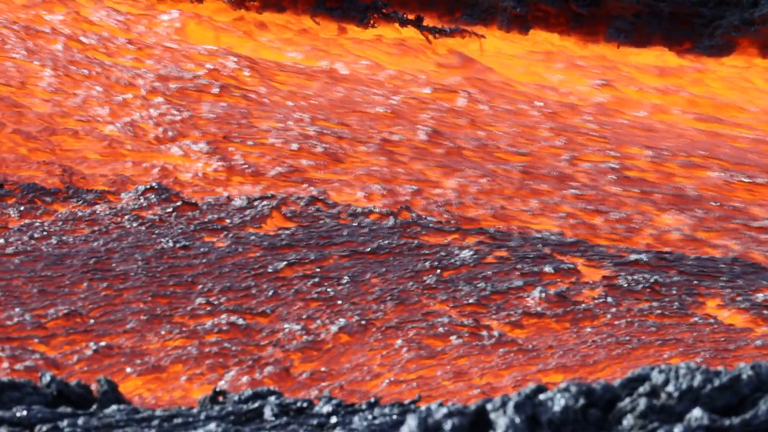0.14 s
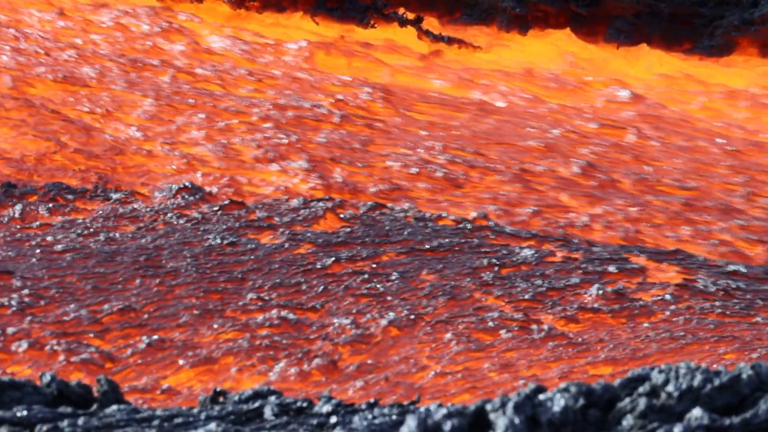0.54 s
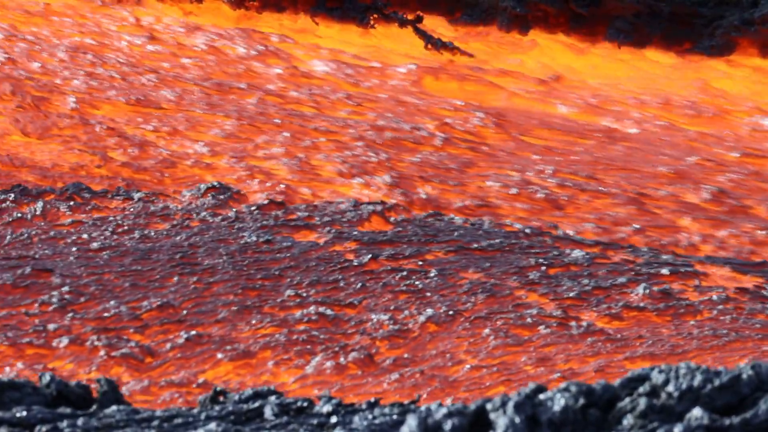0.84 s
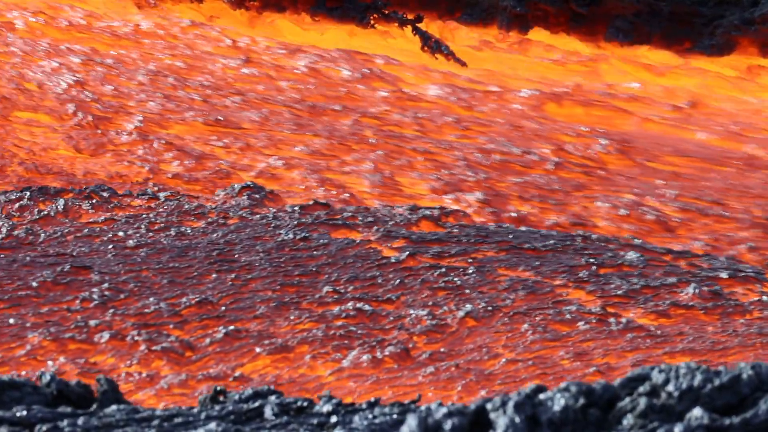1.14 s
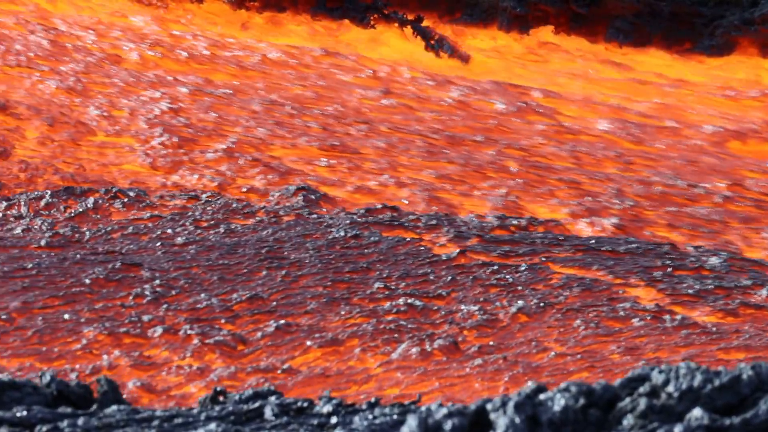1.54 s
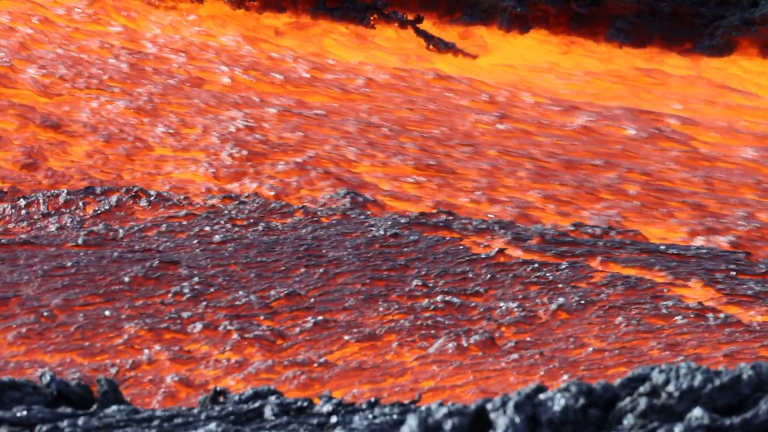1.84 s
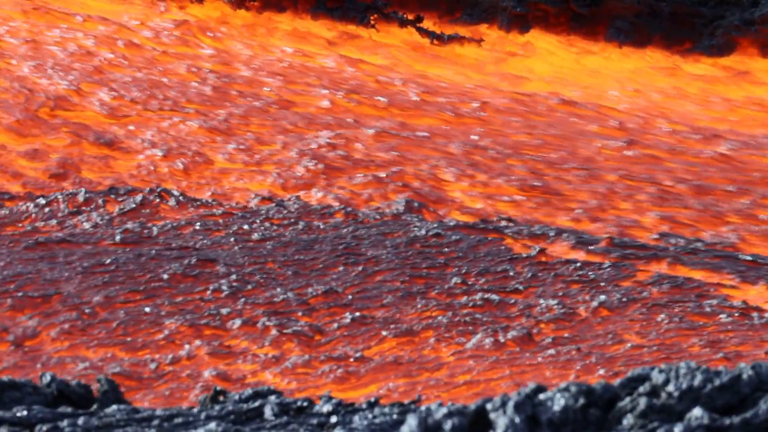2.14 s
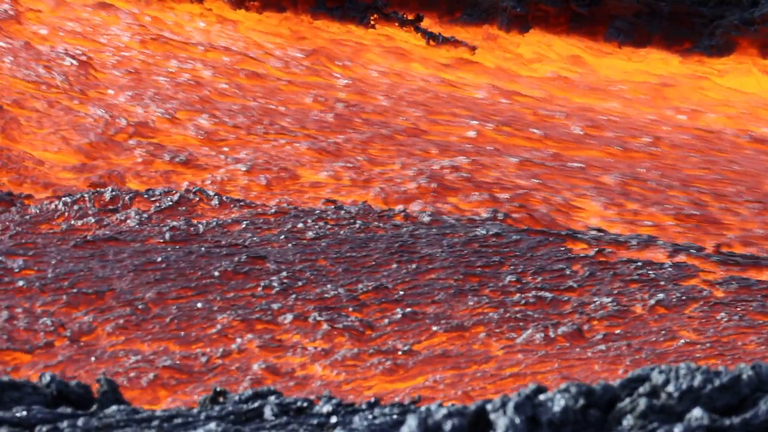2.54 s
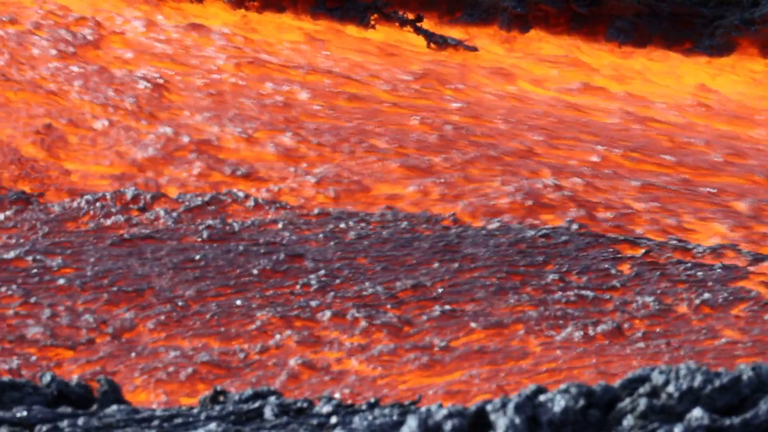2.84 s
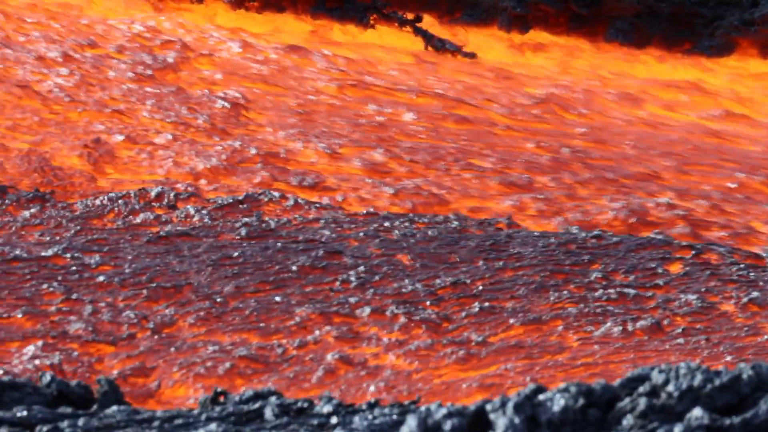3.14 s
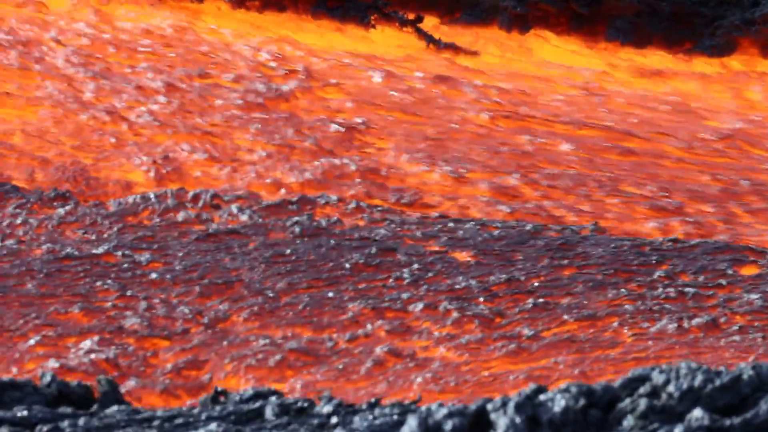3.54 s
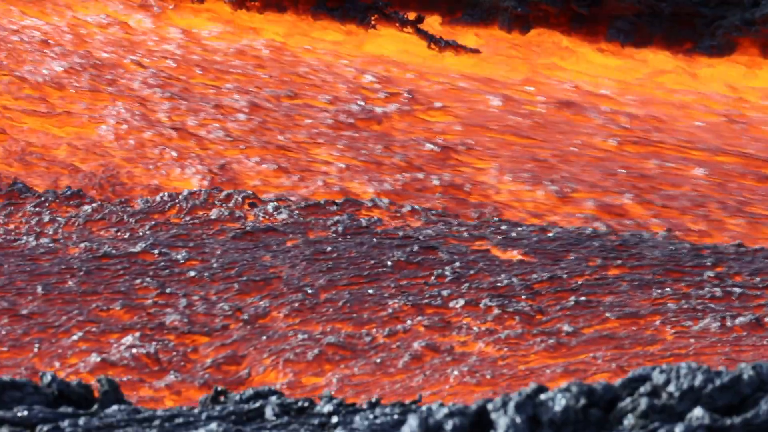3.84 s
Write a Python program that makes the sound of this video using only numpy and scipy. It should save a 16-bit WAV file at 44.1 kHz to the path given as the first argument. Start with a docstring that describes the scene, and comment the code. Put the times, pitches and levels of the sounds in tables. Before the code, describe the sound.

Low gusts of wind rumble against an outdoor microphone, rising and falling, then growing much louder near the end. Behind them, flowing lava makes a quiet, steady roar while its cooling crust faintly hisses and crackles.

```python
"""Gusts of wind buffet the microphone outdoors, building to a strong one at the end.
Turbulent eddies make a low rumble that grows louder and brighter with each gust, joined by
deep pressure swings and a rasp of air. Under the wind a lava stream flows past with a soft roar.
Its cooling crust fractures: countless tiny breaks merge into waves of sizzle, and larger ones
sound singly as small dry ticks, scattered by the rough ground."""
import sys
import numpy as np
from scipy import signal
from scipy.fft import rfft, irfft
from scipy.io import wavfile

SR = 44100
rng = np.random.default_rng(int(sys.argv[2]) if len(sys.argv) > 2 else 0)


def dump(signal):
    """Clip the signal to [-1, 1] and save it as 16-bit WAV at the path in sys.argv[1]."""
    limited = np.clip(np.atleast_2d(signal).T, -1, 1)
    pcm = np.round(limited * 32767).astype(np.int16)
    wavfile.write(sys.argv[1], SR, pcm)


N = 176400
TIME, HZ = np.arange(N) / SR, np.fft.rfftfreq(N, 1 / SR)


def amp(db):
    """Amplitude ratio of a level in decibels."""
    return 10 ** (np.asarray(db) / 20)

def unit_rms(x):
    """Normalisation to unit mean power."""
    return x / np.sqrt(np.mean(x ** 2) + 1e-20)

def spectrum_gain(spectrum, hz):
    """Magnitude response, interpolated in decibels over log frequency."""
    frequency_hz, level_db = np.transpose(spectrum)
    return amp(np.interp(np.log(hz + 1), np.log(frequency_hz + 1), level_db))

def envelope(points, t=TIME):
    """Level contour, interpolated linearly in time."""
    return np.interp(t, *np.transpose(points))

def noise(spectrum):
    """Spectral shaping: white noise filtered to a given colour, at rms 1."""
    return unit_rms(irfft(rfft(rng.standard_normal(N)) * spectrum_gain(spectrum, HZ), N))

def low_pass(x, cutoff_hz):
    """Gaussian filtering attenuates fluctuations faster than the cutoff."""
    return irfft(rfft(x) * np.exp(-(HZ / cutoff_hz) ** 2), N)

def wander(rate_hz):
    """Random modulation: low-passed noise at rms 1."""
    return unit_rms(low_pass(rng.standard_normal(N), rate_hz))


# Spectrum of the flowing lava: frequency_hz, relative_density_db
ROAR_SPECTRUM = [(20, -6), (90, 1.5), (250, -5), (500, -18.5), (1000, -16), (2000, -24.5), (3200, -36),
                 (6500, -35.5), (9300, -38.5), (11200, -34), (15500, -38)]

def lava_roar():
    """Stationary noise: the steady flow gives an even, soft roar."""
    return amp(-52.5) * noise(ROAR_SPECTRUM)


# Waves of fracturing in the cooling crust: time_s, relative_level_db
CRUST_ACTIVITY = [(0, -59), (.07, -58.5), (.16, -69), (.28, -61.5), (.42, -67.5), (.7, -70.5), (.97, -65.5),
                  (1.07, -63.5), (1.4, -64), (1.78, -66), (1.9, -72.5), (2.3, -75), (2.76, -69.5),
                  (2.97, -61.5), (3.08, -63.5), (3.18, -69), (3.52, -72.5), (3.7, -62.5), (4, -62.5)]
# Spectrum of the sizzle: frequency_hz, relative_density_db
SIZZLE_SPECTRUM = [(200, -13), (1000, 1.5), (2000, -11.5), (4000, 3), (5200, 1.5), (6800, 3.5),
                   (9300, -1.5), (11200, 1), (12800, -5), (14000, -1), (16000, -4)]

def crust_sizzle():
    """Incoherent summation: countless tiny fractures merge into a flickering hiss."""
    hiss = noise(SIZZLE_SPECTRUM)
    flicker_db = 2 * wander(rate_hz=60)
    return hiss * amp(envelope(CRUST_ACTIVITY) - 0.8 + flicker_db)

def snap(pitch_hz, decay_s):
    """Damped oscillation: one fracture rises to a peak of 1 and dies away."""
    t = np.arange(256) / SR
    age = t / decay_s
    return age * np.exp(1 - age) * np.cos(2 * np.pi * pitch_hz * (t - decay_s))

def fractures(per_s, spread_db, band_hz, typical_decay_s, pitches=24):
    """Poisson process: independent snaps across a band of pitches, most of them weak."""
    out = np.zeros(N)
    for pitch_hz in np.geomspace(*band_hz, pitches):
        strength = np.minimum(rng.exponential(1, N), 3)
        onsets = rng.random(N) < per_s / pitches / SR
        impulses = onsets * rng.choice([-1, 1], N) * amp(spread_db * strength)
        decay_s = typical_decay_s * 2 ** rng.uniform(-1.02, 1)
        out += np.convolve(impulses, snap(pitch_hz, decay_s))[:N]
    return out

def crust_crackle():
    """Amplitude modulation: fine crackling swells where the crust sizzles."""
    activity_db = envelope(CRUST_ACTIVITY)
    fine = fractures(per_s=400, spread_db=3, band_hz=(1090, 13100), typical_decay_s=0.00016)
    return fine * amp(-60 + 0.65 * (activity_db - activity_db.mean()))

def clinker_crunch():
    """Brittle fracture: crumbling clinker gives sparser, duller snaps that swell with the sizzle."""
    activity_db = envelope(CRUST_ACTIVITY)
    coarse = fractures(per_s=130, spread_db=2.5, band_hz=(800, 4570), typical_decay_s=0.00018)
    return coarse * amp(-57.5 + activity_db - activity_db.mean())


# Louder cracks in the near crust: start_s, relative_peak_db, pitch_hz, decay_steps
CRUST_TICKS = [(.046, -42, 1310, 0.22), (0.092, -39, 5000, 0.058), (0.119, -36, 4200, 0.035),
               (0.157, -40, 1140, 0.35), (0.268, -41, 2370, 0.19), (.298, -43, 2400, .13),
               (0.34, -38, 1410, 0.28), (.348, -42, 1700, .2), (.971, -49, 2400, 0.36),
               (1.014, -43, 11800, .15), (1.017, -38, 10900, 0.12), (1.088, -43, 950, 0.23),
               (1.212, -41, 3800, .15), (1.235, -46.5, 3000, 0.22), (1.338, -41, 1920, .2),
               (1.378, -38, 2100, .15), (1.501, -45, 3920, .25), (1.564, -47, 4000, 0.16),
               (1.641, -40, 1300, 0.16), (1.752, -37, 1700, 0.13), (1.759, -39.5, 1200, .25),
               (1.773, -45, 1600, .2), (1.824, -46.5, 7200, .2), (2.171, -46.5, 6700, 0.24),
               (2.528, -43, 3500, .1), (2.569, -49, 11200, .2), (3.060, -34, 4720, 0.1),
               (3.076, -37.5, 3600, .11), (3.112, -47, 11000, 0.13), (3.239, -52, 4500, .15),
               (3.259, -51, 12000, .3), (3.292, -42, 7600, 0.11), (3.314, -50, 12000, .3),
               (3.551, -42.5, 9100, 0.12), (3.707, -50, 10000, .1), (3.795, -26, 1600, 0.27),
               (3.929, -41, 11000, 0.095)]

def crust_ticks(decay_step_s=0.00097):
    """Impulsive excitation: each single crack radiates one heavily damped tick."""
    out = np.zeros(N)
    for start_s, peak_db, pitch_hz, decay_steps in CRUST_TICKS:
        tick = amp(peak_db + 0.7) * snap(pitch_hz, decay_steps * decay_step_s)
        span = out[round(start_s * SR):][:len(tick)]
        span += tick[:len(span)]
    return out

def ground_scatter(cracks, tail_db=-11.5, decay_s=0.014, size=2048):
    """Diffuse reflection: rough ground adds a very short tail to each crack."""
    tail = rng.standard_normal(size) * np.exp(-np.arange(size) / SR / decay_s)
    tail /= np.linalg.norm(tail)
    return cracks + amp(tail_db) * signal.fftconvolve(cracks, tail)[:N]


# Strength of the wind: time_s, relative_level_db
GUST_LEVELS = [(0, -45), (.13, -50.5), (.2, -44), (.27, -51), (.37, -51), (.43, -39.5), (.51, -48),
               (.57, -41), (.77, -39.5), (.83, -45), (1.2, -42.5), (1.28, -48), (1.39, -38), (1.52, -39.5),
               (1.7, -46), (1.93, -39.5), (2.02, -41), (2.28, -35), (2.41, -34.5), (2.56, -46),
               (2.8, -42.5), (2.89, -34.5), (2.95, -31.5), (3.02, -37), (3.33, -39.5), (3.48, -32),
               (3.59, -33.5), (3.625, -27), (3.78, -26.5), (3.87, -22.5), (3.93, -27), (3.99, -22.5)]

def gust_db(t=TIME, reference_db=-34):
    """Common modulation: wind strength, relative to a reference gust, drives all the wind sounds."""
    return envelope(GUST_LEVELS, t) - reference_db


# Spectrum of air passing the housing: frequency_hz, relative_density_db
RUSH_SPECTRUM = [(100, -13), (400, 1.5), (750, 3), (1300, -4), (2200, -12), (4000, -27), (8000, -36),
                 (15000, -38)]

def wind_rush():
    """Flow noise: air rasps past the microphone housing in the stronger gusts."""
    air = noise(RUSH_SPECTRUM)
    flutter_db = 2.5 * wander(rate_hz=70)
    return air * amp(-58.5 + 1.22 * gust_db() + flutter_db)


# Spectrum of the deepest eddies: frequency_hz, relative_density_db
THUMP_SPECTRUM = [(10, -17), (30, -21), (60, 4), (90, -1.5), (130, -6), (300, -43), (1000, -72),
                  (15000, -100)]

def wind_thump(growth_exponent=1.82):
    """Power-law growth: deep pressure swings rise faster than the rest as a gust builds."""
    return noise(THUMP_SPECTRUM) * amp(-46.5 + growth_exponent * gust_db())


# Spectrum of the buffeting in the reference gust: frequency_hz, relative_density_db
BUFFET_SPECTRUM = [(10, -30), (25, -5.5), (60, 0), (100, -0.5), (170, -3.5), (300, -10), (500, -20),
                   (1000, -32.5), (2000, -43.5), (4000, -49.5), (15000, -95)]

def wind_buffet(level_db=-33.02, octaves_per_db=0.0167):
    """Vortex shedding: faster air sheds quicker, stronger eddies, so gusts are brighter and louder."""
    frames = dict(nperseg=1024, noverlap=768)
    hz, t, white = signal.stft(rng.standard_normal(N), SR, **frames)
    stretch = 2 ** (octaves_per_db * gust_db(t))
    colour = spectrum_gain(BUFFET_SPECTRUM, hz[:, None] / stretch)
    colour /= np.linalg.norm(colour, axis=0)  # equal power in every frame
    _, eddies = signal.istft(white * colour, **frames)
    eddies = unit_rms(eddies[:N])
    rumble = low_pass(eddies, cutoff_hz=320)
    flutter = amp(2 * wander(rate_hz=44.2))  # only the upper part flutters
    return (rumble + (eddies - rumble) * flutter) * amp(level_db + gust_db())


def scene():
    """Superposition: the lava and the wind over it add in one channel."""
    cracks = crust_crackle() + clinker_crunch() + crust_ticks()
    lava = lava_roar() + crust_sizzle() + ground_scatter(cracks)
    wind = wind_rush() + wind_thump() + wind_buffet()
    return (lava + wind)[None]

def record(dry, cutoff_hz=15750):
    """Band limiting: a steep low-pass filter removes the highest treble."""
    kernel = signal.firwin(1023, cutoff_hz, window=("kaiser", 9), fs=SR)
    return signal.oaconvolve(dry, kernel[None], "same")


dry = scene()
out = record(dry)
dump(out)
```